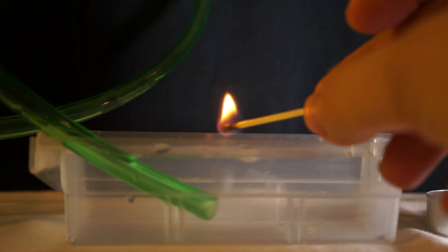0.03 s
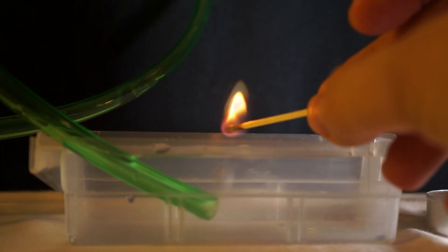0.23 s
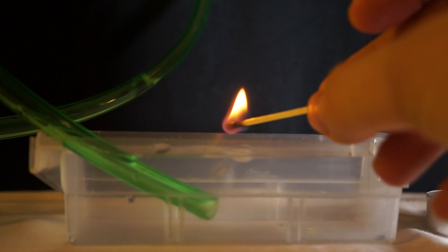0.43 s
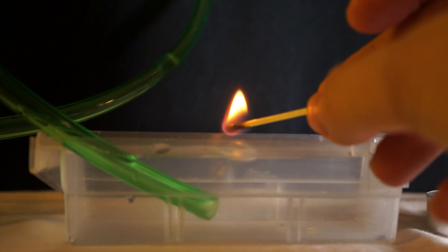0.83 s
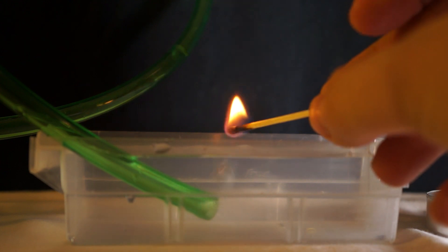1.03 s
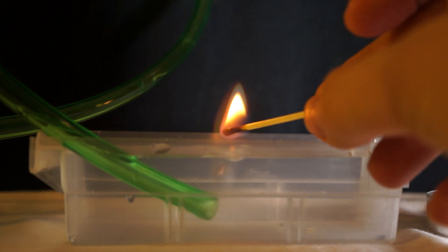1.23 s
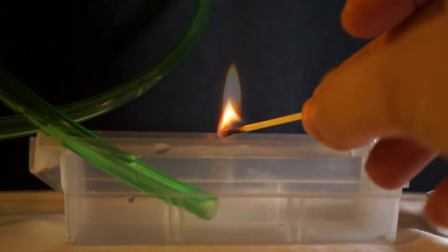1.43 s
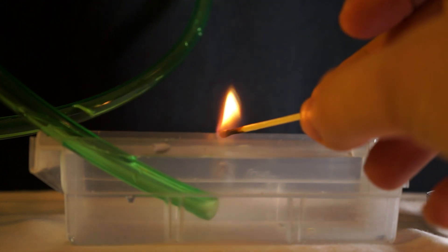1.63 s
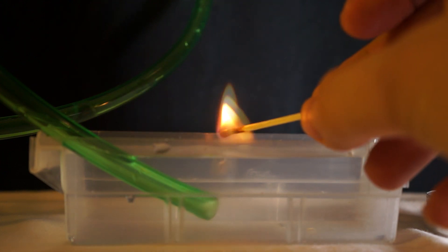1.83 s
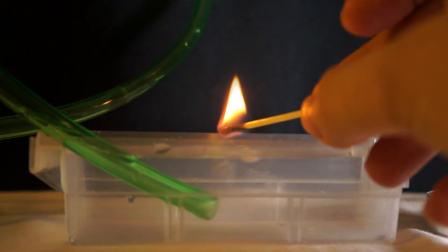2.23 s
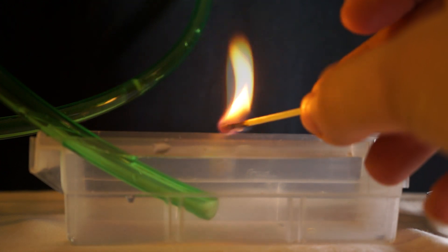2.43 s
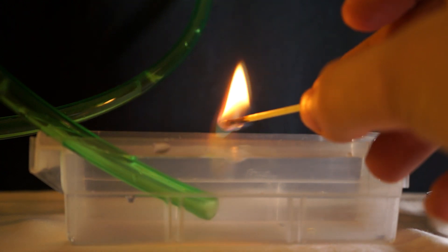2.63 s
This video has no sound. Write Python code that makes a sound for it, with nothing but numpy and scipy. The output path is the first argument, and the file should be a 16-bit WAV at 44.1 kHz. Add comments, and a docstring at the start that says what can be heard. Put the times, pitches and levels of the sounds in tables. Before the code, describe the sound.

Small gas bubbles ignite at a match flame with sharp, short pops, about nine at uneven intervals, each briefly ringing a plastic tub. Faint ticking, tiny drips and hiss lie behind. Heard close up in a small room.

```python
"""Gas bubbles popping at a match

Small bubbles ignite close by, over a plastic tub. The film snaps, the gas goes off with a crack
and a push of air, and tub and room ring briefly. Behind it a clockwork ticks five times a second,
with small drips, crackles, a faint hiss and a low hum."""
import sys
import numpy as np
from scipy import signal
from scipy.fft import rfft, irfft
from scipy.io import wavfile
from scipy.ndimage import uniform_filter1d, minimum_filter1d

SR = 44100
rng = np.random.default_rng(int(sys.argv[2]) if len(sys.argv) > 2 else 0)


def waveform_to_disk(signal):
    """Save audio, clipped to [-1, 1], as 16-bit WAV at the path in sys.argv[1]."""
    frames = np.transpose(np.atleast_2d(signal))
    scaled = np.clip(frames, -1, 1) * 32767
    samples = np.round(scaled).astype(np.int16)
    wavfile.write(sys.argv[1], SR, samples)


N = 119070
TIME_S = np.arange(N) / SR
AGE_S = TIME_S[:16384]
PULSE_S = TIME_S[:2048] - 0.005  # time around an ignition
ROOM_WIDTH = 0.66

# Ignitions. Each row: time in seconds, push in dB, tub ring in dB, burn time in ms, crack in dB,
# crack lead in ms, room in dB, knock in Hz, knock in dB, then the colour of crack and room
# in dB at 0.8, 2, 3.2, 4.5 to 8, and 13 kHz.
IGNITIONS = [(0.2132, -17, 1.5, 0.3, -6.5, 0.16, -1, 1540, -18, 0.5, -2.5, 3, -3, -3.5),
             (0.3378, -22, 0.5, 0.15, -10.5, 0.017, -2, 1290, -32.5, 8.5, -1, -1, -1, -9.5),
             (0.9556, -21, -6.5, 0.77, -15.5, 1.9, -13.5, 1666, -27.5, 6, 1.5, 0.5, 2.5, -3),
             (1.3427, -24, -10.5, 0.68, -17.5, 1.04, -15.5, 1524, -27, 1.5, 0, 3.5, 1.5, 14),
             (1.4164, -14, -7.5, 0.37, 1, 0, -2.5, 765, -16, -2, -2, -3.5, -3.5, -7),
             (1.6884, -15, -8, 0.4, -3, 0.067, -5, 1145, -30, -2.5, -1.5, 0, 0, -12),
             (1.8982, -17, -2, .24, -4, 0.066, -3.5, 1200, -27, 6.5, 3.5, -2, 0, -4.5),
             (2.1373, -18.5, -3, 0.34, -0.5, 0.08, 1, 1350, -17.5, -7, -1, 4, -3.5, -4.5),
             (2.4361, -14.5, -4, 0.44, -3.5, 0.073, -1, 1326, -13.5, -13, 0, 2, 2.5, -2)]
# Further cracks as gas burns in steps. Each row: start in seconds, gain in dB.
STEP_CRACKS = [(0.9556, -21), (1.6870, -17), (1.6892, -31), (1.8991, -19), (2.1374, -15), (2.13845, -21),
               (2.43735, -12)]
# Bursting films. Each row: time in seconds, gain in dB, pitch in Hz, width in ms.
FILM_SNAPS = [(0.2000, -29.5, 8900, 0.2), (0.2044, -37, 13600, 0.17), (0.3097, -24, 8400, .14),
              (0.8585, -38.5, 6100, 0.17), (0.9897, -18, 7860, 0.1), (1.4098, -23, 9740, .1),
              (1.8945, -21.5, 9160, 0.15), (2.1337, -32, 9200, .14), (2.4334, -16.5, 8060, 0.17)]
# Gas burning without a crack. Each row: time in seconds, gain in dB, width in ms.
SLOW_BURNS = [(0.991, -36, 2.1)]

# Small events. Each row: start in seconds, gain in dB.
CRACKLE_HITS = [(0.0755, -38), (0.583, -48), (1.984, -46), (1.988, -58), (2.203, -46.5), (2.300, -48),
                (2.354, -50), (2.388, -47)]
CLOCK_BEATS = [(0.1230, 0), (0.3160, 1.5), (0.5060, 2), (0.7030, 1.5), (0.9040, 2), (1.1080, 1.5),
               (1.3048, 1), (1.5048, 1), (1.6990, -0.5), (1.8940, 5.5), (2.0948, 1.5), (2.2958, 2.5),
               (2.4890, 1), (2.6892, 0.5)]
DRIP_HITS = [(0.108, 5), (0.568, 0.5), (0.606, 5.5), (0.823, 2), (1.075, 1.5), (1.193, 0.5), (1.585, 2.5),
             (1.668, 4), (1.765, 0.5), (1.835, 5.5), (1.9835, 4.5), (2.235, 1), (2.345, 2.5), (2.384, -11),
             (2.510, 3.5), (2.600, 4)]

# Modes. Each row: frequency in Hz, gain in dB, T60 in seconds, left minus right in dB.
TUB_MODES = [(62, -47.5, 0.06, -8.5), (94, -38.5, .07, -14.5), (147.6, -23.5, 0.17, -14),
             (211.8, -25.5, 0.16, -13), (250, -39.5, 0.049, 3.5), (316.7, -12, 0.11, -7.5),
             (348.8, -22.5, 0.084, 12.5), (403, -53.5, .11, 4), (505, -18, 0.1, -7.5), (565, -31, .08, -1),
             (576, -47, .43, -3.5), (646, -25, .09, 3), (826, -33, 0.13, -4)]  # tub and the air around it
WALL_MODES = [(824, -45.5, 0.17, 0), (1463, -39, .06, 3.5), (1813, -40.5, 0.076, 0.5),
              (2108, -34, 0.054, 0.5), (2810, -46, .09, 1), (2830, -42, .1, 2), (3212, -42, .08, 0),
              (4950, -37.5, 0.022, 4), (6490, -33.5, .025, 9)]  # its thin walls
CASE_MODES = [(150, -65.5, 0.23, -8.5), (200, -66.5, .12, -5), (345.6, -60, .08, -10),
              (605, -49.5, 0.01, -9), (962, -55.5, .06, 15), (1013, -42.5, 0.067, -6),
              (1110, -72, .035, 6.5)]  # clockwork case
DRIP_MODES = [(970, -58.5, 0.056, -1.5), (1443, -68, 0.1, -3), (2067, -68.5, 0.063, 5)]

# Spectra. Each row: frequency in Hz, relative level in dB.
CRACK_EQ = [(300, -14.5), (800, -10), (1000, -5.5), (1200, 3.5), (1500, 6.5), (2100, -11.5), (2500, -17.5),
            (2750, -9.5), (3100, -2), (3800, -21), (4800, -0.5), (5600, -8.5), (7500, -4.5), (10000, -14),
            (13000, -17), (14500, -23), (16000, -36)]
NEAR_EQ = [(700, 0.5), (1400, 12.5), (3000, -13), (5000, -0.5), (8000, -7), (12000, -18.5), (16000, -22)]  # reflections off tub, hand and table
ROOM_EQ = [(60, -6), (150, 13), (350, 16), (650, 1.5), (950, -7), (1600, 1.5), (3000, -8), (4000, -10.5),
           (5200, -10), (8000, -22), (11000, -30.5), (16000, -41)]
SCATTER_EQ = [(500, -21.5), (3500, -23.5), (5500, 4), (8500, -1.5), (11000, -2), (13000, -11.5),
              (15000, -23)]
TAP_EQ = [(100, 4.5), (1200, 3), (3000, -5.5), (16000, -23)]
SNAP_TAIL_EQ = [(1000, 0), (16000, 0.0035)]
FIZZ_EQ = [(8100, -40), (9600, -5), (10100, 0), (10600, -5), (12100, -40)]
CRACKLE_EQ = [(500, -12), (1400, 13), (2600, -6), (3800, -5), (5500, 6), (9000, 3), (13000, -5),
              (16000, -17.5)]
TICK_EQ = [(100, -4), (300, -4), (1100, 8.5), (1600, -4), (2500, -19), (6000, -33.5)]
SPLASH_EQ = [(300, -4), (1200, 13), (2300, -13.5), (4000, -7.5), (12000, -34)]
HISS_EQ = [(25, -13), (60, -6), (110, 1), (200, 2.5), (260, -11), (330, 0), (430, -13), (570, -6),
           (800, -15), (1400, -15), (2200, -17.5), (3600, -18), (4300, -14.5), (4900, -12), (5600, -15.5),
           (7500, -12), (10000, -16), (13000, -19.5), (15000, -21.5), (16000, -28.5)]

# Envelopes. Each row: time in seconds, level in dB.
FIZZ_ENVELOPE = [(0.04, -85), (0.11, -70), (0.19, -65.5), (0.23, -82)]
TREBLE_ENVELOPE = [(0.0, -68), (0.25, -67), (0.5, -67.5), (0.6, -65.5), (0.76, -65.5), (0.9, -68),
                   (1.3, -67), (1.6, -68), (2.0, -67), (2.35, -66.5), (2.7, -67.5)]  # hiss treble, taken relative to its mean
# Balance of the hiss. Each row: frequency in Hz, left minus right in dB.
HISS_PAN = [(60, -6.0), (110, -8.5), (200, -1), (380, 2), (700, 0), (1290, 1.5), (2380, 1.0), (4400, 1),
            (8120, 2), (15000, -13)]


def undb(db):
    return 10 ** (np.asarray(db) / 20)


def pan(db):
    """Channel gains for a left minus right level."""
    return undb(np.array([[1], [-1]]) * db / 2)


def fade(t60_s, age_s=AGE_S):
    return np.exp(-np.log(1000) * age_s / t60_s)


def bell(at_s, width_ms, time_s=TIME_S):
    """Gaussian pulse."""
    return np.exp(-np.minimum(((time_s - at_s) * 1000 / width_ms) ** 2 / 2, 60))


def per_bin(points, size=N):
    """A frequency table read at each FFT bin."""
    hz, value = np.array(points, float).T
    return np.interp(np.log(np.arange(size // 2 + 1) * SR / size + 1), np.log(hz), value)


def tint(x, eq):
    size = x.shape[-1]
    return irfft(rfft(x) * undb(per_bin(eq, size)), size)


def click(eq, size=1024):
    """Minimum-phase pulse with the given spectrum."""
    cepstrum = irfft(np.log(undb(per_bin(eq, size))), size)
    cepstrum[1:size // 2] *= 2
    cepstrum[size // 2 + 1:] = 0
    return irfft(np.exp(rfft(cepstrum)), size)


def convolve(x, response):
    return signal.fftconvolve(np.atleast_2d(x), np.atleast_2d(response), axes=1)[:, :N]


def butter(hz, kind="low"):
    return signal.butter(2, hz, kind, fs=SR, output="sos")


def noise(width, size=N):
    """Stereo noise; width is side over mid."""
    mid, side = rng.standard_normal((2, size))
    return (mid + width * side * np.array([[1], [-1]])) / np.hypot(1, width)


def tail(eq, t60_s, width=ROOM_WIDTH):
    """Decaying noise, as of dense reflections."""
    decay = fade(t60_s)
    return tint(noise(width, len(AGE_S)), eq) * decay / np.linalg.norm(decay)


def ring(modes, wave=np.sin):
    return sum(undb(db) * pan(pan_db) * fade(t60_s) * wave(2 * np.pi * hz * AGE_S)
               for hz, db, t60_s, pan_db in modes)


def impulses(rows):
    out = np.zeros(N)
    for at_s, db in rows:
        out[int(at_s * SR)] += undb(db)
    return out


def delayed(x, start_s):
    return np.concatenate([np.zeros(int(start_s * SR)), x, np.zeros(N)])[:N]


def walk(rate_hz):
    """Random drift with unit spread."""
    step = int(SR / rate_hz)
    drift = uniform_filter1d(np.repeat(rng.standard_normal(N // step + 1), step), step)[:N]
    return drift / drift.std()


def cracks():
    """The gas cracks, ringing the tub's walls and echoing off near surfaces and the room."""
    drive = signal.sosfilt(butter(12000), impulses(STEP_CRACKS))
    room_drive = np.zeros(N)
    for at_s, _, _, _, crack_db, lead_ms, room_db, _, _, *colour_db in IGNITIONS:
        low, mid, bite, high, top = colour_db
        pulse = click([(450, 0), (800, low), (1300, 0), (2000, mid), (3200, bite),
                       (4500, high), (8000, high), (13000, top)])
        drive += delayed(undb(crack_db) * pulse, at_s - lead_ms / 1000)
        room_drive += delayed(undb(room_db) * pulse, at_s)
    direct = undb(10.5) * click(CRACK_EQ, len(AGE_S))
    near = undb(6) * tail(NEAR_EQ, t60_s=0.016)
    room = undb(5) * pan(-2.5) * tail(ROOM_EQ, t60_s=0.1)
    return convolve(drive, pan(-1) * (direct + near) + ring(WALL_MODES)) + convolve(room_drive, room)


def air_push():
    """Each ignition shoves the air and gives a short pitched knock."""
    width_ms, lean = 0.73, 0.16  # lean deepens the dip before the peak
    u = PULSE_S * 1000 / width_ms
    shove = (1 - u ** 2) * (1 - lean * u) * bell(0, width_ms, PULSE_S)
    knock_shape = np.where(PULSE_S < 0, bell(0, 0.51, PULSE_S), fade(0.009, np.abs(PULSE_S)))
    out = np.zeros(N)
    for at_s, push_db, _, _, _, _, _, knock_hz, knock_db, *_ in IGNITIONS:
        knock = knock_shape * np.cos(2 * np.pi * knock_hz * PULSE_S)
        out += delayed(undb(push_db) * shove + undb(knock_db) * knock, at_s + PULSE_S[0])
    return pan(0.5) * out


def tub_ring():
    """Each burn rings the tub; a slower burn gives a duller ring."""
    drive = np.zeros(N)
    for at_s, _, ring_db, burn_ms, *_ in IGNITIONS:
        burn = bell(0, burn_ms, PULSE_S)
        drive += delayed(undb(ring_db) * burn / burn.sum(), at_s + PULSE_S[0])
    return convolve(drive, ring(TUB_MODES, np.cos))


def thumps(gain_db=-37, width_ms=2):
    """Hot gas swells, then collapses slowly."""
    swell = (1 - PULSE_S * 1000 / width_ms) * bell(0, width_ms, PULSE_S)
    collapse = 0.33 * bell(0.006, 3 * width_ms, PULSE_S) * (PULSE_S > 0)
    hits = impulses([(row[0] + PULSE_S[0], gain_db) for row in IGNITIONS])
    return pan(-8.5) * convolve(hits, swell - collapse)


def film_snaps():
    """A bursting film chirps for a few cycles, taps the tub and scatters off it."""
    hits = impulses([row[:2] for row in FILM_SNAPS])
    chirps = sum(undb(db) * bell(at_s, width_ms) * np.sin(2 * np.pi * hz * (TIME_S - at_s))
                 for at_s, db, hz, width_ms in FILM_SNAPS)
    snaps = chirps + convolve(hits, click(SCATTER_EQ))
    taps = undb(-24) * convolve(hits, click(TAP_EQ))
    reflections = undb(-8) * convolve(snaps, tail(SNAP_TAIL_EQ, t60_s=0.013))
    return pan(1.5) * (snaps + taps + reflections)


def puff():
    """A slow burn gives only a low puff."""
    return pan(-10) * sum(undb(db) * (bell(at_s, ms) - 0.5 * bell(at_s + 3 * ms / 1000, 2 * ms))
                          for at_s, db, ms in SLOW_BURNS)


def gas_fizz():
    """Escaping gas fizzes in a narrow band, leading into the first pop."""
    fizz = tint(noise(width=0.44), FIZZ_EQ)
    at_s, db = np.array(FIZZ_ENVELOPE).T
    return fizz / fizz.std() * undb(np.interp(TIME_S, at_s, db, left=-120, right=-120))


def crackles():
    """Foam and match give tiny dry bursts."""
    return undb(12) * convolve(impulses(CRACKLE_HITS), tail(CRACKLE_EQ, t60_s=0.0099, width=0.45))


def clockwork():
    """Each beat softly knocks and rings the case."""
    knock = undb(-22) * tail(TICK_EQ, t60_s=0.03, width=0.46)
    ticks = convolve(impulses(CLOCK_BEATS), ring(CASE_MODES) + knock)
    return signal.sosfilt(butter(hz=1600), ticks)


def drips():
    """Drops plink in the tub with a short splash."""
    splash = undb(-36) * tail(SPLASH_EQ, t60_s=0.04, width=0.79)
    return convolve(impulses(DRIP_HITS), ring(DRIP_MODES) + splash)


def hiss(gain_db=-61, flicker_db=1):
    """Room rumble and soft hiss whose treble swells and flickers."""
    air = tint(noise(width=0.77), HISS_EQ)
    air *= undb(gain_db) / air.std()
    treble = signal.sosfiltfilt(butter(3500, "high"), air)
    at_s, db = np.array(TREBLE_ENVELOPE).T
    treble_db = np.interp(TIME_S, at_s, db - db.mean()) - flicker_db * walk(4.7)
    air += treble * (undb(treble_db) - 1)
    return irfft(rfft(air) * pan(per_bin(HISS_PAN)), N)


def hum(hz=202.4, waver=0.17):
    """A low tone wavering in level and phase."""
    level = undb(-70) * (1 + waver * walk(7.6))
    return pan(-9.5) * level * np.sin(2 * np.pi * hz * TIME_S + waver * walk(2.8))


def whine(hz=14000):
    """A thin, unsteady tone high in the hiss."""
    return undb(-81.5) * walk(120) * np.sin(2 * np.pi * hz * TIME_S)


def scene():
    """Pops and film snaps in front, small sounds behind."""
    pops = cracks() + air_push() + tub_ring() + thumps()
    front = pops + film_snaps() + puff() + gas_fizz()
    return front + crackles() + clockwork() + drips() + hiss() + hum() + whine()


def record(dry):
    """The recorder cuts deep bass, ducks briefly under the tallest peaks and cuts the top."""
    low_cut_hz, top_hz, limit_db, limit_ms = 50, 15700, -3, 0.24
    span = int(limit_ms * SR / 1000)
    dry = signal.sosfilt(butter(low_cut_hz, "high"), dry)
    gain = np.minimum(1, undb(limit_db) / (np.abs(dry).max(axis=0) + 1e-9))
    limited = dry * uniform_filter1d(minimum_filter1d(gain, span), span)
    return signal.sosfilt(signal.ellip(8, 0.2, 70, top_hz, fs=SR, output="sos"), limited)


dry = scene()
out = record(dry)
waveform_to_disk(out)
```